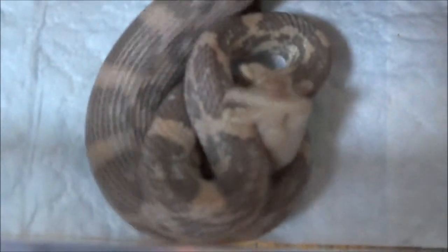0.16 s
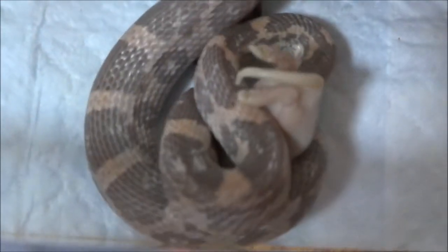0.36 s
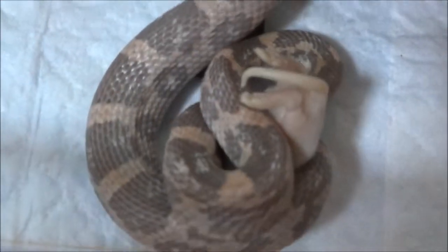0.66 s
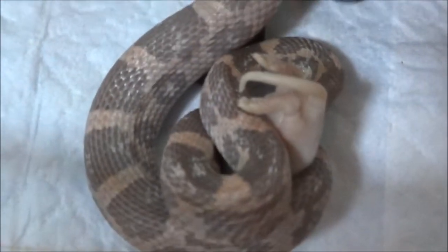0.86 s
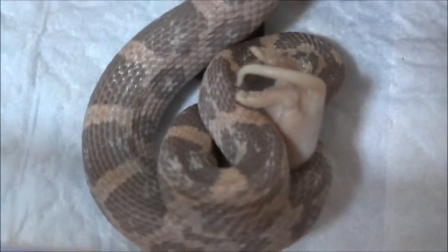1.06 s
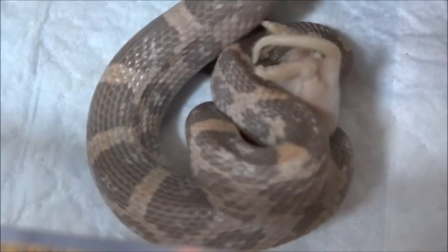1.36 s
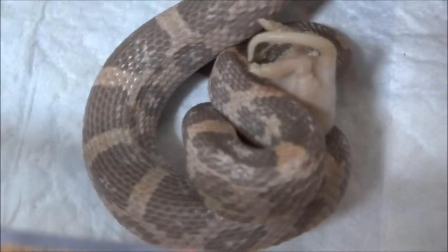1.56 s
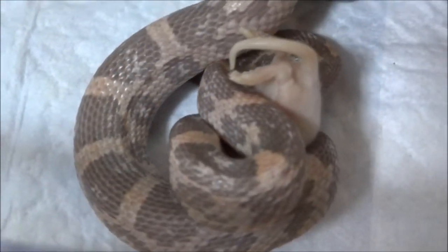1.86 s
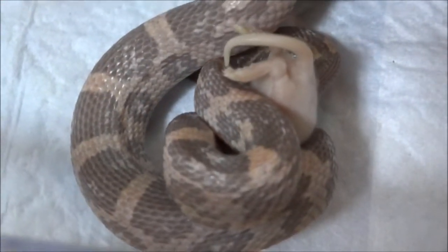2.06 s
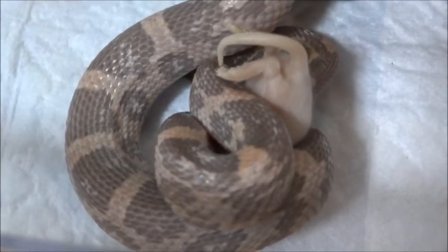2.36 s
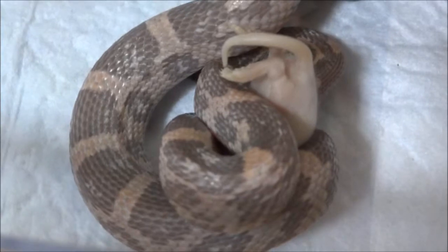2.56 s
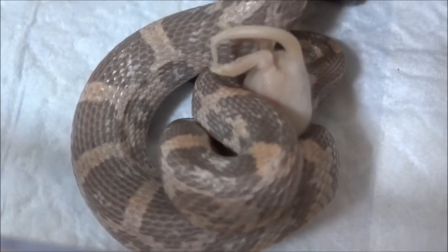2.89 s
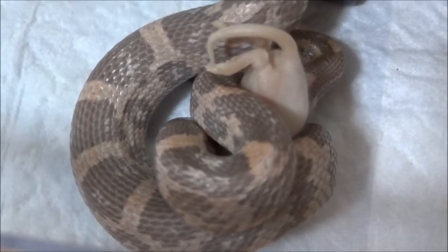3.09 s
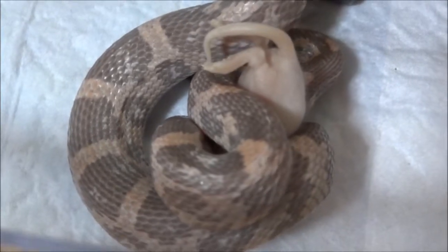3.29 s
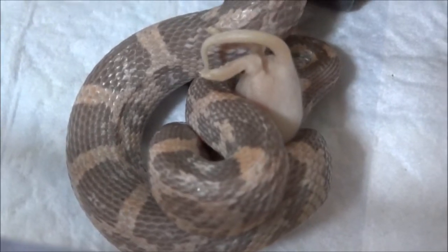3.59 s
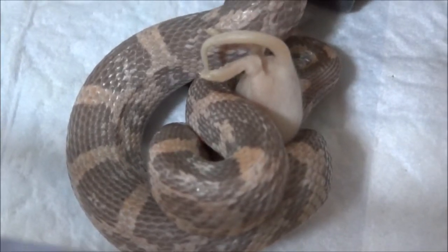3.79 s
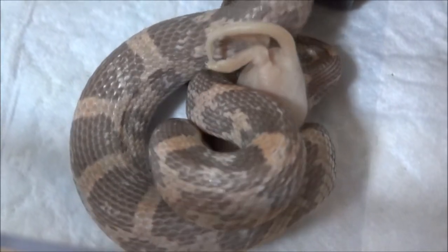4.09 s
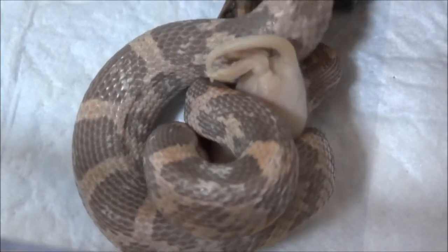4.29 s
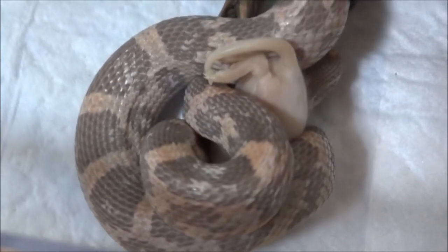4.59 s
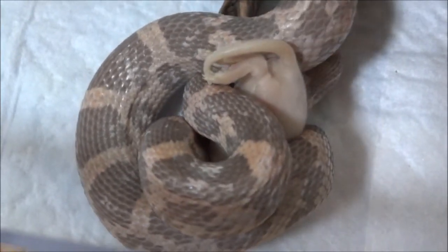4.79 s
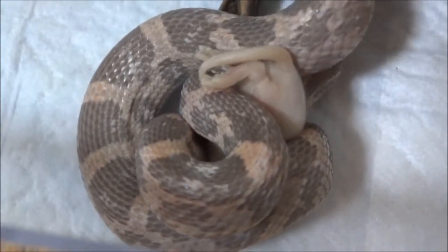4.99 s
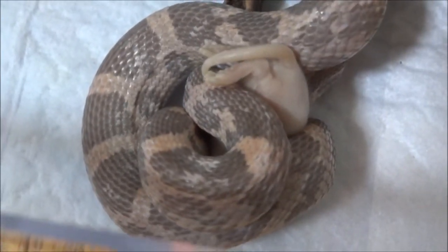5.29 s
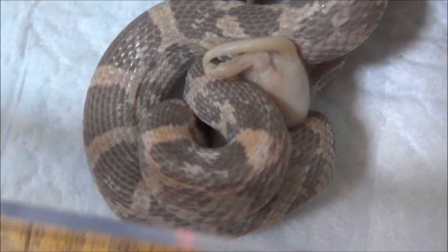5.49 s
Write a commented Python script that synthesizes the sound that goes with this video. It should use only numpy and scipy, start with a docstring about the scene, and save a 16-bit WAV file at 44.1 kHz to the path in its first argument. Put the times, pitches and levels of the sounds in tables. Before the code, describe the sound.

Thin, very high rodent squeaks chatter almost without pause in a quiet room, with soft papery rustles and small knocks on a plastic tub.

```python
"""A snake coils round a mouse on a paper pad in a plastic tub, indoors.
From the start, room noise and a hum lie under faint creeping rustle and overlapping runs of thin squeaks:
gliding sines with an octave, coloured by resonance, cancellation and noise-like reverberation.
From 1.4 s ticks excite decaying tub modes; from 1.8 s shoves rumble and strokes of scales rustle as filtered
random slips; ringing bumps, decaying sines, sound at 1.9 s and again at 5.3 s."""
import sys
import numpy as np
from scipy import signal
from scipy.fft import rfft, irfft, next_fast_len
from scipy.io import wavfile

SR = 44100
rng = np.random.default_rng(int(sys.argv[2]) if len(sys.argv) > 2 else 0)


def inscribe(sig):
    """Save sig as 16-bit PCM at rate SR to the path in sys.argv[1].

    A 1-D sig is mono; a 2-D sig holds one channel per row.
    Samples are clipped to [-1, 1] before scaling.
    """
    pcm = np.round(np.clip(np.atleast_2d(sig).T, -1, 1) * 32767)
    wavfile.write(sys.argv[1], SR, pcm.astype(np.int16))


N = 249165
TIME = np.arange(N) / SR

# Levels in the tables are nominal source levels, ahead of later gains, colouring and reflections.
# Runs of quick squeaks: [first squeak t/s, count, first gap/s, gap growth per squeak/s, base f/Hz,
# f step per squeak/Hz, crest level/dB, crest position/squeaks from the first, length scale/s, fall scale/Hz]
RUNS = [(0.004,2,0.052,0,5820,48,-32,0.5,0.016,850), (0.084,4,0.047,0.0065,5190,-41,-28,2.1,0.029,614),
        (0.241,2,0.049,0,5230,118,-36.5,1,0.026,199), (0.335,3,0.054,-0.0022,4750,-29,-40.5,0.2,0.01,500),
        (0.533,4,0.052,0.011,4933,27.5,-32,1.56,0.033,60), (0.595,1,0,0,5370,0,-37.5,0.5,0.03,60),
        (0.703,3,0.048,-0.0015,5830,-24,-35,1.7,0.032,800),
        (0.796,3,0.054,0.0075,4682,34,-36.5,2,0.011,230),
        (0.816,4,0.044,0.00017,5295,38,-39.5,2.3,0.031,60),
        (1.032,4,0.052,-0.007,5145,-16.5,-29,1.5,0.035,646), (1.285,5,0.05,0.012,4880,-68,-40,2,0.032,151),
        (1.302,3,0.049,-0.003,5360,14,-37.5,2,0.022,60), (1.406,3,0.045,0.0019,5840,-8,-34,1.8,0.025,574),
        (1.622,3,0.048,0.011,5014,-59.5,-31.5,1,0.032,504), (1.68,4,0.055,0.0046,5356,-43.5,-34,2,0.02,60),
        (1.785,3,0.046,0.0066,4824,81,-26.5,0.34,0.02,60), (1.897,2,0.083,0,5270,34,-31.5,0.3,0.009,60),
        (2.012,2,0.054,0,5170,-10,-28,0.96,0.029,730), (2.138,2,0.052,0,4860,34,-28.5,0.64,0.014,430),
        (2.247,3,0.054,0.0076,5360,29,-39,0.9,0.023,60), (2.322,3,0.084,-0.035,5278,27,-31,0.5,0.02,60),
        (2.353,2,0.047,0,4840,25,-33,1,0.013,370), (2.508,5,0.047,0.0038,5350,43,-30,-0.1,0.013,60),
        (2.565,3,0.051,-0.00094,4898,40.5,-32.5,2.1,0.035,500),
        (2.745,2,0.055,0,4848,-37.5,-33,0.93,0.035,60), (2.759,3,0.045,0.018,5660,140,-32.5,0.5,0.026,870),
        (2.934,1,0.01,0,4944,0,-31.5,0,0.026,620), (2.961,3,0.055,-0.016,5344,-2,-29,0.7,0.019,60),
        (3.061,3,0.041,-0.015,5150,62,-27,0.3,0.028,757), (3.148,2,0.1,0,5220,-260,-45.5,1.5,0.012,60),
        (3.357,5,0.061,-0.005,5363,-27.5,-30,2.5,0.021,62), (3.361,3,0.044,0.017,5000,8,-33.5,1.6,0.036,60),
        (3.552,2,0.05,0,4820,77,-30.5,1,0.021,60), (3.631,3,0.06,-0.014,5010,-130,-45,0,0.021,250),
        (3.951,3,0.053,0.0086,5420,-22,-35.5,1.14,0.014,60), (4.034,2,0.047,0,4930,5,-32,1,0.019,530),
        (4.169,2,0.069,0,4790,47,-30.5,1,0.013,300), (4.251,2,0.055,0,5380,68,-41.5,0.2,0.04,60),
        (4.357,3,0.047,-0.0023,4960,34,-30,1.35,0.033,656), (4.477,2,0.045,0,5850,168,-37,0.3,0.022,850),
        (4.529,4,0.05,0.00094,5203,48.5,-30,2.5,0.026,171),
        (4.642,4,0.061,-0.0087,4750,31,-30,2.5,0.022,60.6),
        (4.695,3,0.047,0.0093,5190,-30,-28,1.4,0.033,430),
        (4.939,4,0.047,0.0018,4900,-33,-29,2.2,0.021,100),
        (4.955,5,0.046,0.0055,5220,46,-29,2.5,0.028,169.7),
        (5.126,5,0.066,-0.0068,5277,14,-30.5,2,0.02,120), (5.234,2,0.061,0,4740,100,-32.5,1,0.009,475),
        (5.462,3,0.047,-0.0034,4965,178.5,-36.5,2.5,0.034,846),
        (5.534,2,0.057,0,5775,-20,-32.5,1,0.027,800)]
RUN_FADE_DB, RUN_FADE_POWER = 3.0, 1.21   # loss one squeak from the crest, and exponent of its growth
# Faint squeaks after the strong ones: level relative to the strong squeak, base pitch and their spreads
STRAY_DB, STRAY_SPREAD_DB, STRAY_HZ, STRAY_SPREAD_HZ = -13.5, 0.5, 5080, 257
STRAY_LENGTH_S, STRAY_FALL_HZ = 0.01, 296
# High resonances that squeaks leave ringing: [f/Hz, level at resonance/dB, t60/s]
ECHO_MODES = [(4740, -3, 0.072), (4720, -10.5, 0.041), (5130, -30, 0.28), (5520, -12, 0.22),
              (5630, 1, 0.092), (5690, -16, 0.23), (6100, -5, 0.22)]
# Bands where reflections cancel: [f/Hz, width/Hz, level at centre/dB]
CANCELLED = [(5605, 95, -3.5), (5920, 116, -8)]
# Strokes of scales over paper: [start t/s, end t/s, rustle level/dB, rasp level/dB, swell start to end/dB]
STROKES = [(1.92, 2.01, -53.5, -59.5, 0.5), (2.03, 2.107, -55, -65, -6), (2.141, 2.138, -52, -53, 0),
           (3.175, 3.34, -80, -61, -3.5), (3.87, 3.9, -61, -69, 5), (4.263, 4.37, -59.5, -62, -2),
           (4.779, 4.829, -48, -54.5, 6.5), (4.996, 5.105, -51, -51.5, 0),
           (5.155, 5.325, -53.5, -51.5, -0.5)]
STROKE_ATTACK_S, STROKE_RELEASE_S = 0.036, 0.036   # time to change by 10 dB
# Creeping of the coils: [t/s, rustle level/dB]
CREEP = [(0, -69), (1.8, -64), (2.4, -68), (3.7, -68.5), (4.3, -65), (5.65, -64.5)]
CREEP_RASP_DB = -1.5   # relative to the creeping rustle
# Shoves of the pad over the tub floor: [start t/s, end t/s, rumble level/dB, swell start to end/dB]
SHOVES = [(1.80, 2.0, -67.5, 6), (4.735, 4.788, -53, -7), (4.832, 4.953, -62, -6),
          (5.284, 5.359, -61.5, -8)]
SHOVE_ATTACK_S, SHOVE_RELEASE_S = 0.008, 0.087   # time to change by 10 dB
# Relative spectra of paper rustle, low rasp and floor rumble: [f/Hz, level per Hz/dB]
RUSTLE = [(1500, -27), (3000, -8), (4200, 3), (6000, 2.5), (8000, -3.5), (10500, -3), (13000, -10.5),
          (16000, -28)]
RASP = [(300, -20), (700, -10), (1200, -2.5), (2200, -1.5), (3200, -5.5), (5000, -18)]
RUMBLE = [(50, -21), (100, -1), (190, 2.5), (300, 2), (450, 1), (900, -20)]
# Ticks and knocks on the tub: [t/s, thud level/dB, clack level/dB, snap level/dB, favoured f/Hz]
KNOCKS = [(1.444, -52, -52.5, -70, 200), (1.953, -46.5, -52, -68, 277), (2.3478, -51, -47.5, -64, 220),
          (2.3974, -56, -39.5, -55, 1100), (2.520, -50.5, -73, -72, 394), (2.7188, -50, -47.5, -63, 750),
          (2.834, -47.5, -43, -69, 1400), (2.909, -51.5, -47.5, -62, 610), (3.150, -50, -48.5, -64, 450),
          (3.6582, -51, -45.5, -49, 2600), (3.867, -64, -73, -59, 3000), (4.091, -54, -39, -40, 2430),
          (4.2915, -37.5, -38.5, -49, 1580), (4.306, -49, -55, -60, 440), (4.479, -81, -71, -57, 3000),
          (5.291, -58, -44.5, -65, 1230)]
# Modes of the tub floor, which thuds: [f/Hz, relative level/dB, t60/s]
FLOOR_MODES = [(178, 2, 0.017), (257, 0.5, 0.027), (382, 7, 0.012), (510, 8, 0.015), (680, -1, 0.01)]
# Modes of the tub walls, which clack: [f/Hz, relative level/dB, t60/s]
WALL_MODES = [(740, -2, 0.016), (1008, 2.5, 0.013), (1417, -1.5, 0.021), (1690, 2.5, 0.0081),
              (2390, 5, 0.0085), (2906, -1.5, 0.017), (3710, -1, 0.017)]
# Partials of the ringing bumps: [t/s, f/Hz, level at onset before the soft rise/dB, t60/s]
RING = [(1.895, 223.3, -62, 0.39), (1.905, 1110, -55.5, 0.24), (5.302, 460, -45.5, 0.4),
        (5.303, 1084, -54.5, 0.21)]
# Colour of the reverberation: [f/Hz, level/dB]
WALLS = [(100, -12), (500, 5), (2000, 6.5), (5000, 0.5), (10000, -0.5), (16000, -48)]
ROOM_T60_S = 0.23
# Left-right likeness of diffuse sound: [f/Hz, correlation]
LIKENESS = [(30, .95), (70, 0.72), (140, 0.67), (270, 0.13), (520, -0.36), (1000, -0.35), (2000, -0.1),
            (4500, 0.78), (8000, 0.83), (13000, 1)]
# Relative spectrum of the room air: [f/Hz, level per Hz/dB]
AIR = [(25, -41), (45, -7), (90, -7.5), (150, -2), (300, 1), (500, 4), (1000, 2), (2000, -3.5), (3500, -9),
       (7000, -10.5), (10000, -16), (13000, -14.5), (16000, -18.5)]
AIR_DB = -57.5
HUM_HZ, HUM_DB = 58.6, -81
CUTOFF_HZ = 15800


def squeaks(level_db=1.0, octave_db=-33.0, core=0.46, flick_hz=373.0, drop_hz=448.0,
            lowest_hz=4556.0, full_db=-31.5, waver_hz=50.2, rasp_hz=60.0,
            octave_follows=0.45, octave_db_per_khz=3.0):
    """Frequency modulation: thin whistles glide as they swell and fade; returns whistle and overtone."""
    whistle, overtone = np.zeros((2, N))
    unsteady_hz = waver_hz * wobble(0.0006) + rasp_hz * wobble(0.00012)
    for s, hz, peak_db, length, fall in [*squeak_runs(), *strays()]:
        first = max(int((s - 0.7 * length) * SR), 0)
        last = min(int((s + 1.1 * length) * SR), N)
        at = np.arange(first, last)
        u = 2 * (at / SR - s) / length   # half lengths from the loudest moment

        effort = min(from_db((peak_db - full_db) / 2), 1)   # harder squeaks slide further
        limit_hz = np.where(u < 0, flick_hz, -min(drop_hz, hz - lowest_hz))
        reach_hz = effort * limit_hz / (1 + 10 * fall / hz)
        bend = np.abs(u) ** 3 / (1 + np.abs(u) ** 3)   # the middle is hardly bent, the ends most
        pitch = hz - fall * np.tanh(u) / 2 + reach_hz * bend + unsteady_hz[at]
        phase = 2 * np.pi * np.cumsum(pitch) / SR

        swell = signal.windows.tukey(len(at), 0.25) / (1 + (u / core) ** 2)
        whistle[at] += from_db(peak_db + level_db) * swell * np.sin(phase)
        overtone_db = full_db + octave_db + octave_follows * (peak_db - full_db)
        overtone_db += octave_db_per_khz * (hz - lowest_hz) / 1000
        # the octave is concentrated in the strong middle
        overtone[at] += from_db(overtone_db) * swell ** 2 * np.sin(2 * phase)
    return whistle, overtone


def squeak_runs():
    """Pulse train: pitch and gap step evenly about a level crest; yields (t/s, f/Hz, dB, length/s, fall/Hz)."""
    for start, count, gap, gap_growth, hz, step_hz, peak_db, crest, length, fall in RUNS:
        for k in range(int(round(count))):
            time = start + gap * k + gap_growth * k * (k - 1) / 2
            loss_db = RUN_FADE_DB * abs(k - crest) ** RUN_FADE_POWER
            yield time, hz + step_hz * k, peak_db - loss_db, length, fall


def strays():
    """Random scatter: a weak squeak of chance pitch follows each run squeak, in the same columns."""
    for s, _, peak_db, _, _ in squeak_runs():
        late_s = rng.uniform(0.012, 0.04)
        off_pitch, off_level = rng.standard_normal(2)
        hz = STRAY_HZ + STRAY_SPREAD_HZ * off_pitch
        level_db = peak_db + STRAY_DB + STRAY_SPREAD_DB * off_level
        yield s + late_s, hz, level_db, STRAY_LENGTH_S, STRAY_FALL_HZ


def wall_echo(x, delay_s, echo_db):
    """Specular reflection: a hard surface returns one delayed, weaker copy."""
    return x + from_db(echo_db) * np.interp(TIME - delay_s, TIME, x, left=0)


def resonate(x):
    """Resonance: a squeak that slides through a mode leaves it ringing."""
    out = x.copy()
    for hz, db, t60 in ECHO_MODES:
        to_unit_peak = 2 * np.log(1000) / (t60 * SR)
        out += from_db(db) * to_unit_peak * ring(x, hz, t60)
    return out


def cancel(x):
    """Destructive interference: close walls hollow out narrow bands, weakening squeaks that cross them."""
    for hz, width_hz, depth_db in CANCELLED:
        band = signal.lfilter(*signal.iirpeak(hz, hz / width_hz, fs=SR), x)
        x = x - (1 - from_db(depth_db)) * band
    return x


def sliding(clump_db=1.5, floor_width=0.23):
    """Stick-slip friction: scales catch on paper in tiny slips; the heavy body rumbles on the tub floor."""
    rustle_gain = from_db(in_time(CREEP))
    rasp_gain = from_db(CREEP_RASP_DB) * rustle_gain
    for start, end, rustle_db, rasp_db, swell_db in STROKES:
        stroke = movement(start, end, swell_db, STROKE_ATTACK_S, STROKE_RELEASE_S)
        rustle_gain = np.hypot(rustle_gain, from_db(rustle_db) * stroke)
        rasp_gain = np.hypot(rasp_gain, from_db(rasp_db) * stroke)
    drag_gain = np.zeros(N)
    for start, end, db, swell_db in SHOVES:
        drag_gain += from_db(db) * movement(start, end, swell_db, SHOVE_ATTACK_S, SHOVE_RELEASE_S)

    clumps = from_db(clump_db * wobble(0.0012))
    rustle = rustle_gain * clumps * rms_one(spread(grains(per_s=2000, spread_db=1.0), RUSTLE))
    rasp = rasp_gain * rms_one(spread(grains(per_s=1500, spread_db=0.0), RASP))
    rumble = drag_gain * rms_one(spread(grains(per_s=500, spread_db=3.0), RUMBLE))
    middle = rumble.mean(axis=0)   # the floor moves mostly as one piece
    return pan(rustle + rasp, left_db=0.5) + middle + floor_width * (rumble - middle)


def movement(start, end, swell_db, attack_s, release_s):
    """Exponential growth and decay: gain rises, holds with a swell or sag, and falls."""
    held = np.interp(TIME, [start, end], [-0.5, 0.5])
    outside = np.maximum(start - TIME, 0) / attack_s + np.maximum(TIME - end, 0) / release_s
    return from_db(swell_db * held - 10 * outside)


def grains(per_s, spread_db):
    """Shot noise: two streams of random clicks of uneven size and either sign."""
    sizes = from_db(spread_db * np.minimum(rng.exponential(1, (2, N)), 4))
    signs = rng.choice([-1, 1], (2, N))
    return sizes * signs * (rng.random((2, N)) < per_s / SR)


def knocks(thud_db=-1.0, clack_db=0.0, snap_db=19.0, snap_t60=0.0033, snap_hz=3500, snap_top_hz=11000):
    """Impact excitation: the floor thuds, the walls clack and a brief noise snaps."""
    times, thud, clack, snap, _ = np.transpose(KNOCKS)
    burst = np.zeros(N)
    for s, db in zip(times, snap):
        burst += from_db(db - 60 * np.abs(TIME - s) / snap_t60) * (TIME >= s)
    band = signal.butter(1, [snap_hz, snap_top_hz], "band", fs=SR, output="sos")
    crack = signal.sosfilt(band, burst * rng.standard_normal(N))
    modes = strike(FLOOR_MODES, thud + thud_db) + strike(WALL_MODES, clack + clack_db)
    return modes + from_db(snap_db) * crack


def strike(modes, levels_db, focus_db=4.5, uneven_db=1.2):
    """Modal superposition: each knock favours modes near its pitch (focus in dB/octave), with chance added."""
    times, favoured_hz = np.array(KNOCKS)[:, 0], np.array(KNOCKS)[:, -1]
    octaves_off = np.abs(np.log2(np.array(modes)[:, 0] / favoured_hz[:, None]))
    extra_octaves = octaves_off - octaves_off.min(axis=1, keepdims=True)   # nearest mode loses nothing
    colour_db = -focus_db * extra_octaves + uneven_db * rng.standard_normal(octaves_off.shape)
    out = np.zeros(N)
    for k, (hz, mode_db, t60) in enumerate(modes):
        clicks = np.zeros(N)
        clicks[(times * SR).astype(int)] = from_db(levels_db + mode_db + colour_db[:, k])
        out += (-1) ** k * ring(clicks, hz, t60)   # neighbouring modes in opposite sign
    return out


def ring(clicks, hz, t60):
    """Damped oscillation: a unit click starts a decaying sine of nominal height 1."""
    r, w = from_db(-60 / (t60 * SR)), 2 * np.pi * hz / SR
    return signal.lfilter([0, np.sin(w)], [1, -2 * r * np.cos(w), r * r], clicks + 1e-18)


def ringing_bump(rise_s=0.0057):
    """Free vibration: something beside the tub is nudged and hums briefly as softly rising, decaying sines."""
    out = np.zeros(N)
    for s, hz, onset_db, t60 in RING:
        age = np.maximum(TIME - s, 0)
        envelope = from_db(onset_db - 60 * age / t60) * (1 - np.exp(-age / rise_s))
        out += envelope * np.sin(2 * np.pi * hz * age)
    return out


def room(x, near_db, near_t60, far_db):
    """Reverberation: direct sound, dense reflections from near walls and the room's tail, by convolution."""
    t = np.arange(SR // 2) / SR
    noise = rng.standard_normal((2, 2, len(t)))
    near = from_db(-60 * t / near_t60) * (t > 0.002)
    far = from_db(-60 * t / ROOM_T60_S) * (t > 0.009)
    response = from_db(near_db) * noise[0] * near / np.linalg.norm(near)
    response += from_db(far_db) * noise[1] * far / np.linalg.norm(far)
    both = np.atleast_2d(x) * np.ones((2, 1))
    return x + signal.fftconvolve(both, spread(response, WALLS), axes=1)[:, :N]


def air():
    """Stationary noise: steady room hiss over a faint sinusoidal hum."""
    hiss = from_db(AIR_DB) * rms_one(spread(rng.standard_normal((2, N)), AIR))
    return hiss + from_db(HUM_DB) * np.sqrt(2) * np.sin(2 * np.pi * HUM_HZ * TIME)


def spread(pair, spectrum):
    """Interchannel coherence: unrelated signals become coloured left and right of set correlation."""
    count = pair.shape[1]
    size = next_fast_len(count)
    hz = np.fft.rfftfreq(size, 1 / SR)
    mid, side = rfft(pair, size) * from_db(at_hz(spectrum, hz))
    alike = np.clip(at_hz(LIKENESS, hz), -0.99, 0.99)
    left_right = np.sqrt((1 + alike) / 2) * mid + np.sqrt((1 - alike) / 2) * side * [[1], [-1]]
    return irfft(left_right, size)[:, :count]


def pan(x, left_db):
    """Interaural level difference: left stands left_db above right."""
    return x * from_db([[left_db / 2], [-left_db / 2]])


def wobble(smooth_s):
    """Low-pass filtering: four smoothing stages turn noise into random motion of unit RMS."""
    r = np.exp(-1 / (smooth_s * SR))
    return rms_one(signal.sosfilt([[1 - r, 0, 0, 1, -r, 0]] * 4, rng.standard_normal(N)))


def from_db(db):
    """Logarithmic level: decibels to amplitude gain."""
    return 10 ** (np.asarray(db) / 20)


def rms_one(x):
    """Power normalisation: scale to unit mean square."""
    return x / np.sqrt(np.mean(x ** 2) + 1e-20)


def in_time(rows):
    """Linear interpolation: a curve read at every sample."""
    return np.interp(TIME, *np.transpose(rows))


def at_hz(points, hz):
    """Logarithmic frequency: a spectrum interpolated on a log axis."""
    knots, values = np.transpose(points)
    return np.interp(np.log(hz + 1), np.log(knots), values)


def scene():
    """Superposition: squeaks a little to the left, the tub close by, the room all round."""
    whistle, overtone = squeaks()
    whistle = wall_echo(whistle, delay_s=0.014, echo_db=-16.0)
    whistle = cancel(resonate(whistle))
    whistle = room(whistle, near_db=-5.0, near_t60=0.027, far_db=-4.0)
    # the overtone is beamed aside, so mostly heard reflected
    overtone = room(from_db(-3.5) * overtone, near_db=4.5, near_t60=0.13, far_db=5.0)
    tub = room(knocks(), near_db=-6.5, near_t60=0.021, far_db=-15.0)
    close_by = pan(tub + ringing_bump() + overtone, left_db=0.5)
    return pan(whistle, left_db=4.0) + close_by + sliding() + air()


def record(dry):
    """Band limitation: a steep elliptic low-pass removes the top."""
    return signal.sosfilt(signal.ellip(12, 0.1, 80, CUTOFF_HZ, fs=SR, output="sos"), dry)


dry = scene()
out = record(dry)
inscribe(out)
```